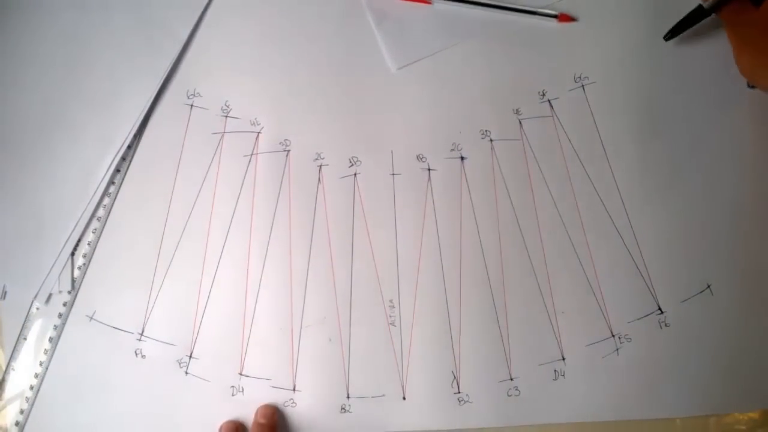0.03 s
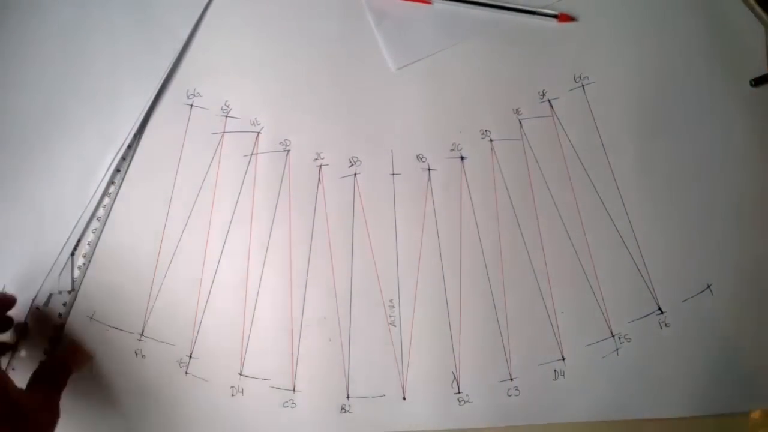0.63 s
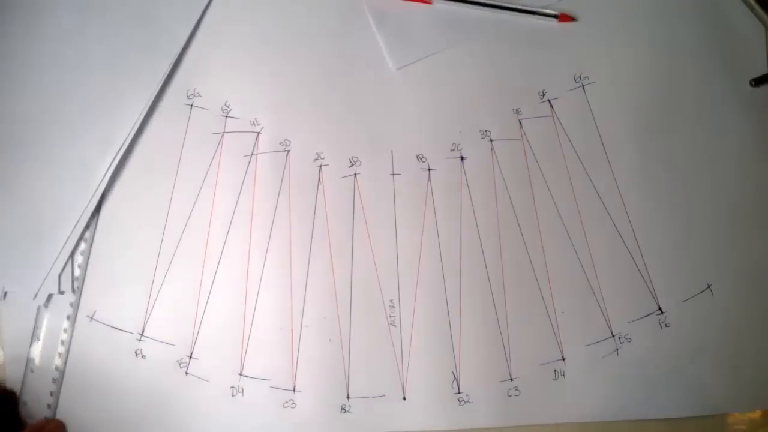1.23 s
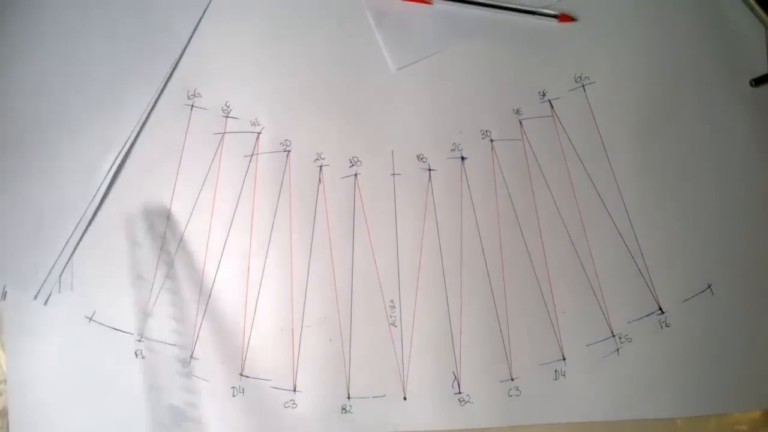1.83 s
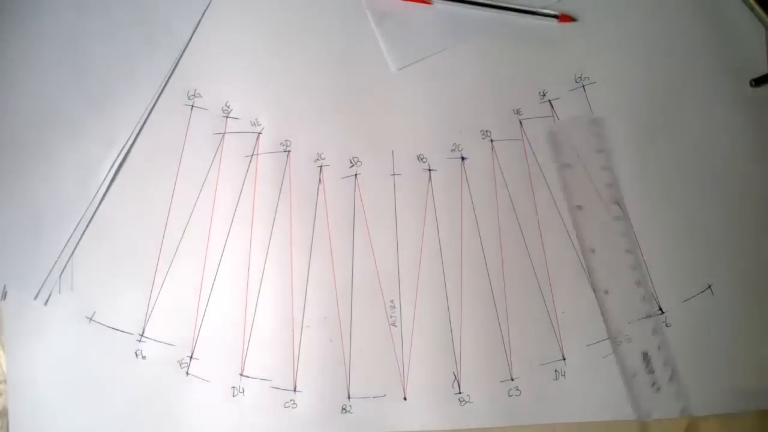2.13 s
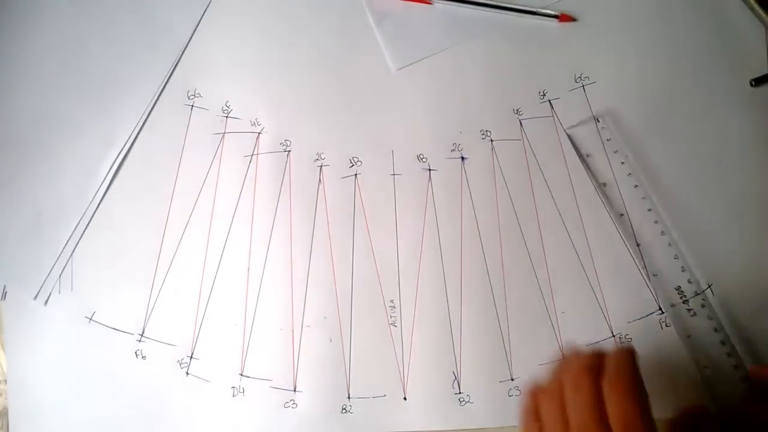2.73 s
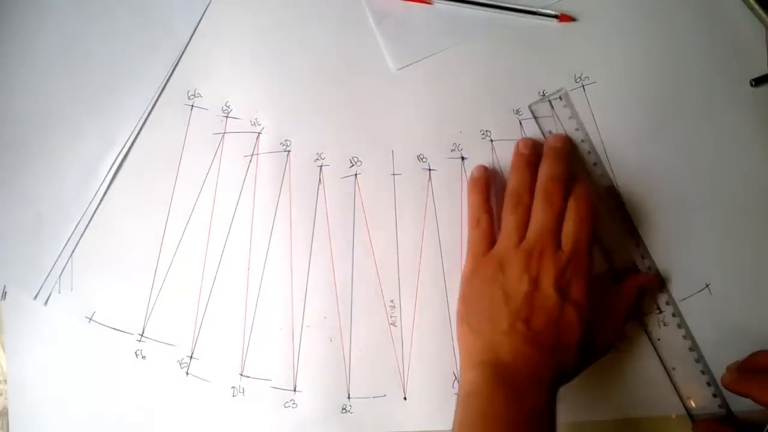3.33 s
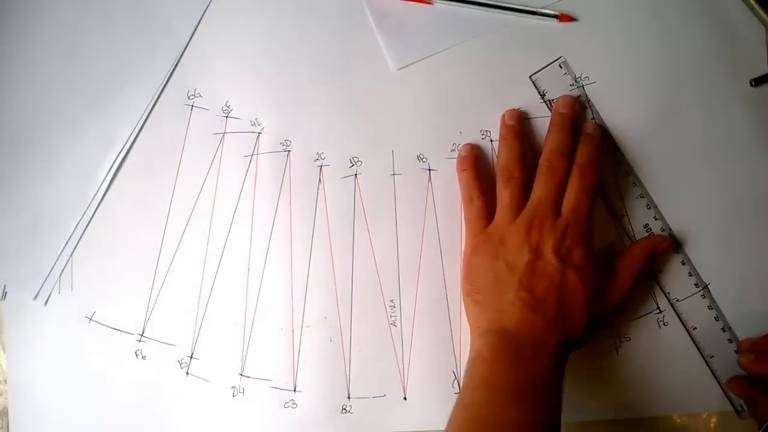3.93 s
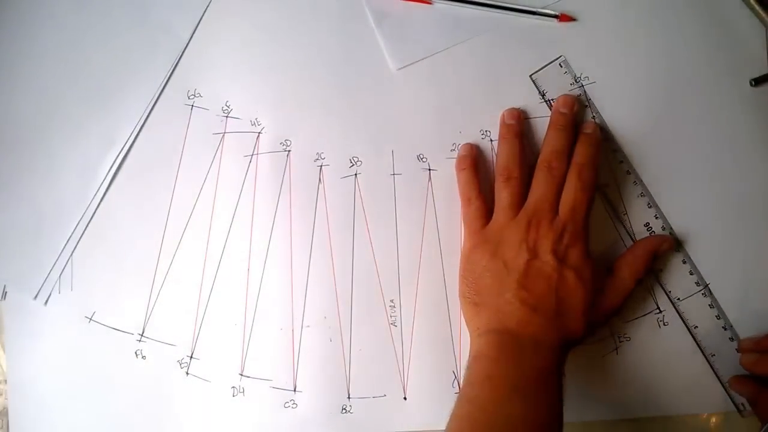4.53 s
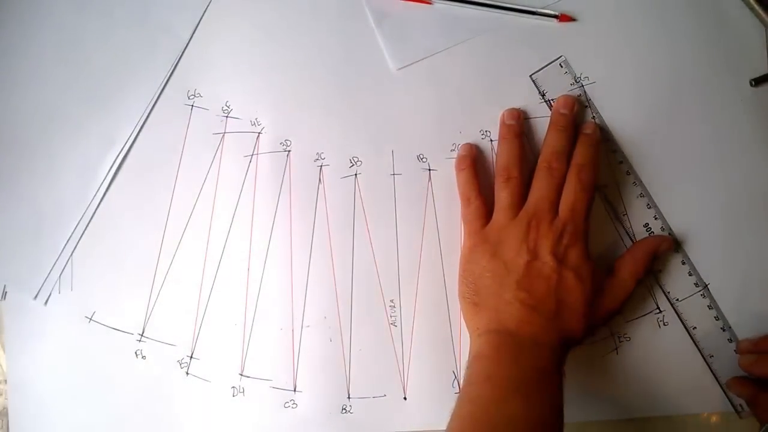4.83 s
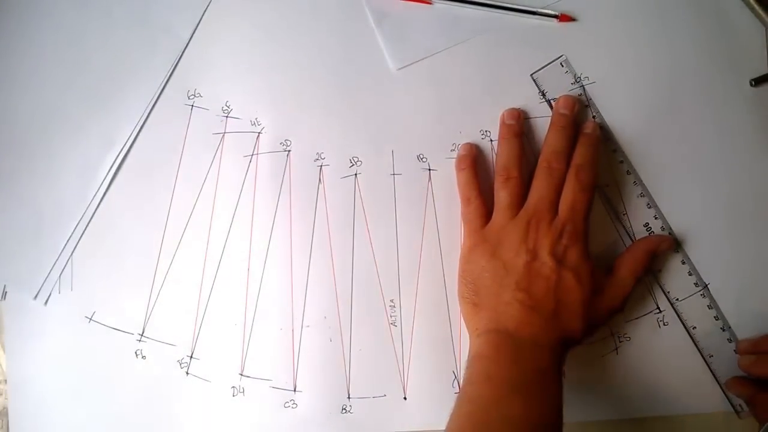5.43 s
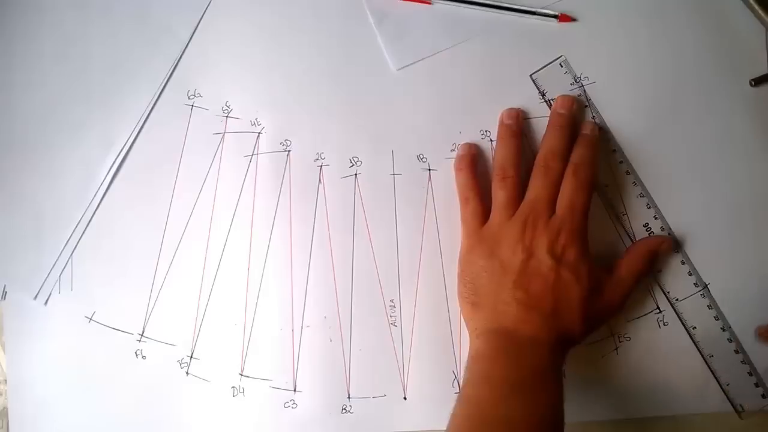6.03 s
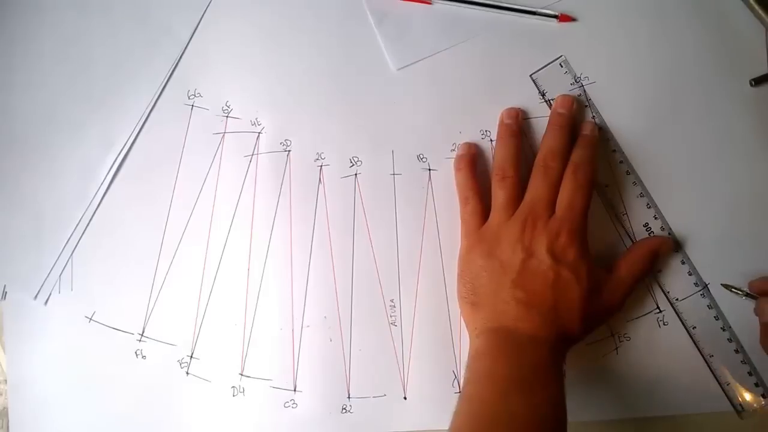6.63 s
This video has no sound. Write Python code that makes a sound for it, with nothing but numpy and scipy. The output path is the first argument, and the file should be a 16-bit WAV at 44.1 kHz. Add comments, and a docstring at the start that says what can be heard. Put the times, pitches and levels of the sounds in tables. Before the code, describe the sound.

A plastic ruler taps and scrapes on paper amid two heavy knocks on a drawing board, with small birds chirping outside.

```python
"""Ruler on a drawing board

A plastic ruler is picked up, set down on the paper and slid into place: it ticks, chatters and scrapes.
Hands bump the board and brush the sheet, sleeves rustle, and a pen rings as it is taken up.
Two heavy knocks ring the board's modes and overload a small camera microphone.
Small birds chirp outside, over quiet room noise and a thin electrical whine."""
import sys
import numpy as np
from scipy import signal
from scipy.fft import rfft, irfft, next_fast_len
from scipy.io import wavfile
from scipy.ndimage import uniform_filter1d, map_coordinates

SR = 44100
rng = np.random.default_rng(int(sys.argv[2]) if len(sys.argv) > 2 else 0)


def put_to_file(sound):
    """Save the sound as 16-bit audio at rate SR, in the file named by the first command-line argument."""
    columns = np.atleast_2d(sound).T  # one column per channel
    safe = np.clip(columns, -1, 1)
    whole_steps = np.round(safe * 32767)
    wavfile.write(sys.argv[1], SR, whole_steps.astype(np.int16))


N = 294543


def amp(db):
    """Decibels to gain."""
    return 10 ** (np.asarray(db) / 20)


def unit(x):
    """Scaled to rms 1."""
    return x / np.sqrt(np.mean(x ** 2) + 1e-20)


def along(points, hz):
    """A curve of (f/Hz, value) points, read on a log frequency axis."""
    f, values = np.transpose(points)
    return np.interp(np.log(hz + 1), np.log(f + 1), values)


def tilted(spectrum, slope_db):
    """A spectrum tipped about 3.5 kHz by slope_db per octave; the tilt shelves below 1 kHz."""
    return [(hz, db + slope_db * np.log2(max(hz, 1000) / 3500)) for hz, db in spectrum]


def fader(rows):
    """Gain per sample from (t/s, level/dB) rows, silent outside them."""
    s, db = np.transpose(rows)
    return amp(np.interp(np.arange(N) / SR, s, db, left=-120, right=-120))


def swell(start, end, ramp):
    """Gain of one movement: it speeds up, holds and stops."""
    t = np.arange(N) / SR
    return np.clip(np.minimum(t - start, end - t) / ramp + .5, 0, 1)


def fade(t, t60):
    """Exponential decay of 60 dB in t60."""
    return np.exp(-np.log(1000) * t / t60)


def wobble(rate):
    """A smooth random curve, rate knots a second."""
    knots = rng.standard_normal(int(N * rate / SR) + 4)
    return map_coordinates(knots, [np.arange(N) * rate / SR])


def coloured(x, spectrum):
    """x through an EQ curve of (f/Hz, level/dB), at rms 1."""
    size = next_fast_len(len(x) + 8192)
    eq = amp(along(spectrum, np.fft.rfftfreq(size, 1 / SR)))
    return unit(irfft(rfft(x, size) * eq, size)[:len(x)])


def snap(spectrum, size=1024):
    """The shortest causal pulse with this spectrum, peak 1."""
    eq = amp(along(spectrum, np.fft.rfftfreq(size, 1 / SR)))
    cepstrum = irfft(np.log(eq))
    cepstrum[1:size // 2] *= 2
    cepstrum[size // 2 + 1:] = 0
    pulse = irfft(np.exp(rfft(cepstrum)))
    return pulse / np.abs(pulse).max()


def dense_modes(spectrum, t60s):
    """A quarter second of noise-like ring, each band fading at its own speed."""
    noise = coloured(rng.standard_normal(SR // 4), spectrum)
    hz, t, bands = signal.stft(noise, SR, nperseg=256)
    decay = fade(t, along(t60s, hz)[:, None])
    return signal.istft(bands * decay, SR, nperseg=256)[1][:SR // 4]


def friction(spectrum, density, grain_db, size=N):
    """Hiss with tiny slips of uneven size, density a second."""
    slips = (rng.random(size) < density / SR) * rng.standard_normal(size)
    return coloured(rng.standard_normal(size) + amp(grain_db) * unit(slips), spectrum)


def shifting(x, patchy_db):
    """Hollows and bright spots that wander through a sound."""
    bands = signal.stft(x, nperseg=512)[2]
    patches = uniform_filter1d(rng.standard_normal(bands.shape), size=7, axis=0)
    patches = uniform_filter1d(patches, size=18, axis=1)
    return signal.istft(bands * amp(patchy_db * unit(patches)), nperseg=512)[1][:len(x)]


def add(track, s, sound):
    """Mix a sound into the track at time s."""
    start = round(s * SR)
    track[start:start + len(sound)] += sound[:N - start]


# room tone EQ: f/Hz, level/dB
ROOM_EQ = [(12, -33), (25, -1.5), (45, 3), (78, 1), (110, -4), (300, -10.5), (450, -16.5), (900, -20),
           (1300, -18.5), (2300, -24), (5000, -25), (6000, -29), (9000, -37), (16000, -33)]
# mains hum and thin whine: f/Hz, rms level/dB
HUM_TONES = [(54, -52), (161.5, -57.5), (1096, -58.5)]


def room(air_db=-43.5, waver_hz=1.57, rumble_db=4.0):
    """A bed of low room noise under electrical tones that waver together."""
    air = amp(air_db + 0.42 * wobble(2.9)) * coloured(rng.standard_normal(N), ROOM_EQ)
    bass = signal.filtfilt(*signal.butter(2, 150, fs=SR), air)
    air += (amp(rumble_db * wobble(10)) - 1) * bass  # the bass swells and sinks on its own
    t = np.arange(N) / SR
    drift = np.cumsum(waver_hz * wobble(20)) / SR
    hum = sum(amp(db) * np.sqrt(2) * np.sin(2 * np.pi * (hz * t + drift)) for hz, db in HUM_TONES)
    return air + hum


# fader ride of the moving arms: t/s, level/dB
ARM_MOVES = [(0.0, -43.5), (0.32, -42.5), (1.34, -49.5), (1.83, -41.5), (1.94, -40.5), (2.31, -49),
             (2.67, -55.5), (2.93, -68), (3.11, -48.5), (3.39, -43.5), (3.61, -54), (4.1, -54.5)]
# cloth EQ: f/Hz, level/dB
SLEEVE_EQ = [(60, 2), (200, -3.5), (450, -2), (900, -10.5), (1700, -7), (3000, -9.5), (5500, -13.5),
             (9000, -31.5)]


def sleeves(trim_db=1.0):
    """Cloth rustles softly until the arms come to rest."""
    rustle = shifting(friction(SLEEVE_EQ, density=600, grain_db=-5), patchy_db=2.5)
    return amp(trim_db) * fader(ARM_MOVES) * rustle


# the board's ringing modes: f/Hz, level/dB, t60/s
BOARD_MODES = [(58.4, -10, 0.26), (78.5, -2.5, 0.23), (122.4, 0, 0.15), (153.2, -0.5, 0.17),
               (194, -2, 0.13), (247, 8, 0.068), (291.5, 2, 0.15), (317, -3.5, 0.13), (403, -1, 0.14),
               (463, -18.5, 0.26), (522, -17, 0.14), (633, -23, 0.3), (770, -26, 0.15), (829, -19, 0.12),
               (930, -4, 0.088), (1010, -13, 0.153), (1148, -5, 0.11), (1350, -11, 0.15), (1710, -23, 0.15)]
# thud of its dense upper modes and the room: f/Hz, level/dB
THUD_EQ = [(30, -18.5), (70, -2.5), (300, -4.5), (600, -1), (1300, -9.5), (2200, -8.5), (4000, -28),
           (9000, -65.5)]
# decay of that thud: f/Hz, t60/s
THUD_DECAY = [(60, 0.12), (300, 0.22), (1000, 0.14), (4000, 0.18)]


def board(hardness_hz, place, ring_db=-10, thud_db=-13, attack_s=0.0015):
    """One blow at a place (0-1) rings the board; hardness is a low-pass corner, so soft blows are dull."""
    t = np.arange(SR // 4) / SR
    hz, db, t60 = np.transpose(BOARD_MODES)[:, :, None]
    # bending waves shorten with the root of frequency, so the place sets each mode's strength and sign
    shape = np.cos(np.pi * place * np.sqrt(hz / hz[0]))
    strength = shape * amp(db + rng.standard_normal(db.shape))
    ring = np.sum(strength * np.sin(2 * np.pi * hz * t) * fade(t, t60), axis=0)
    body = amp(ring_db) * ring + amp(thud_db) * dense_modes(THUD_EQ, THUD_DECAY)
    attack = 1 - np.exp(-t / attack_s)  # the motion takes a moment to fill the board
    return signal.lfilter(*signal.butter(2, min(hardness_hz, SR / 4), fs=SR), body * attack)


# soft hand bumps: t/s, level/dB, hardness/Hz
BUMP_CUES = [(.137, -11, 360), (1.252, -18, 330), (1.686, -8, 260), (1.97, -21.5, 199), (3.092, -5.5, 49),
             (3.521, -10.5, 66.3)]


def hand_bumps():
    """A hand lands near the board's edge with one dull thump."""
    out = np.zeros(N)
    for s, db, hardness_hz in BUMP_CUES:
        add(out, s, amp(db) * board(hardness_hz, place=0.748))
    return out


# heavy knocks: t/s, level/dB, hardness/Hz, place/0-1, lead of the first touch/s, touch level/dB
KNOCK_CUES = [(.206, 7.5, 860, 0.75, .0205, 3), (1.605, 8, 670, .08, .0147, -5)]


def knocks(rebounds=3, gap_s=.0155, loss_db=8, softening=0.45):
    """An edge touches the board, the full weight follows, then rebounds, each weaker and softer."""
    out = np.zeros(N)
    for s, db, hardness_hz, place, lead_s, touch_db in KNOCK_CUES:
        add(out, s - lead_s, amp(touch_db) * board(2 * hardness_hz, place=0.205))
        add(out, s, amp(db) * board(hardness_hz, place))
        for k in range(1, rebounds + 1):
            rebound = board(hardness_hz * softening ** k, place=0.858)
            add(out, s + k * gap_s, amp(db - k * loss_db) * rebound)
    return out


# hard plastic taps: t/s, tick level/dB, chatter trim/dB, ring trim/dB, board level/dB
TAP_CUES = [(.188, -21, 2, -3, -30), (1.068, -25.5, -10, 28, -33), (1.244, -19.5, -10, 7, -31),
            (1.486, -23, -2.5, 19, -21), (1.592, -24.5, 6, -2, -25), (1.687, -17, 5.5, 1, -35),
            (1.82, -24, 9.5, -3, -14.5), (1.83, -26.5, 9, -7, -12), (1.92, -21.5, 2.5, 17.5, -22.5),
            (2.632, -7.5, -3.5, -25, -27), (2.695, -11.5, -8.5, -14, -44), (3.0394, -14, 2, 11.5, -25),
            (3.954, -39.5, 9, 19, -48), (5.954, -38, 10, 11, -50), (6.0803, -19.5, -3, 2.5, -41)]
# tick EQ before brightening: f/Hz, level/dB
TICK_EQ = [(300, 1.5), (1000, -9), (1800, 1.5), (2600, 3), (3200, 4), (4000, 4), (5200, 0.5), (6500, -12),
           (8500, -26.5), (15000, -48)]
# the plastic strip's modes: f/Hz, level/dB, t60/s
RULER_MODES = [(1430, -35.5, 0.064), (2584, -27.5, 0.029), (2877, -34, 0.032), (3646, -47, 0.079),
               (4246, -54, 0.073), (4800, -40, 0.055)]


def ruler_taps(chatter_db=-12, chatter_t60=0.18, spikiness=0.54):
    """A sharp tick rings the strip and nudges the board; the strip then chatters on the paper."""
    out, t = np.zeros(N), np.arange(SR // 3) / SR
    ring = sum(amp(db) * np.sin(2 * np.pi * hz * t) * fade(t, t60) for hz, db, t60 in RULER_MODES)
    for s, db, chatter_trim_db, ring_db, board_db in TAP_CUES:
        tick = amp(ring_db) * ring
        add(tick, 0, snap(tilted(TICK_EQ, slope_db=4.5)))
        contacts = unit(rng.standard_normal(len(t)) * np.exp(spikiness * rng.standard_normal(len(t))))
        force = amp(chatter_db + chatter_trim_db) * contacts * fade(t, chatter_t60) / np.linalg.norm(tick)
        force[0] = 1  # the first hit
        add(out, s, amp(db) * signal.fftconvolve(force, tick))
        add(out, s, amp(board_db) * board(hardness_hz=1190, place=0.622))
    return out


# strokes of hand and ruler over the sheet: start/s, end/s, level/dB, rasp against the hiss/dB
STROKE_CUES = [(0.254, 1.03, -46, 0.5), (1.032, 1.083, -37, -16), (1.168, 1.37, -41, -7.5),
               (1.352, 1.432, -35.5, -6), (1.465, 1.606, -44, -17), (1.589, 1.71, -35.5, -16),
               (1.758, 1.906, -41, -2), (1.918, 1.983, -38, -16), (2.275, 2.436, -41, -12),
               (2.502, 2.606, -49, -3), (2.714, 2.903, -47.5, 4), (3.147, 3.335, -49, -16),
               (3.31, 3.6, -41.5, -11), (3.762, 3.911, -48.5, -20), (4.121, 4.19, -50.5, -2),
               (4.226, 4.375, -51.5, 0), (5.995, 6.122, -46, -14)]
# paper hiss EQ before tilting: f/Hz, level/dB
PAPER_EQ = [(200, -10), (500, -11.5), (1100, -15), (1600, -7.5), (2200, -5.5), (3100, -1.5), (3900, -5),
            (4600, -0.5), (5500, -6), (6700, -9), (8400, -23), (12000, -33)]
# narrow rasp near 5 kHz: f/Hz, level/dB
RASP_EQ = [(3500, -45), (4850, -14), (5250, 0), (5600, -11), (6800, -19), (9000, -50)]


def paper_strokes(ramp_s=.04, firm_db=-39, firm_slope_db=1, thinning=0.29, uneven_db=0.7):
    """Skin and plastic slide over the paper; the lighter the touch, the thinner the hiss."""
    out = np.zeros(N)
    for start, end, db, rasp_db in STROKE_CUES:
        t = np.arange(int((end - start + ramp_s) * SR)) / SR
        speed = np.clip(np.minimum(t, t[-1] - t) / ramp_s, 0, 1)
        slope_db = firm_slope_db + thinning * (firm_db - db)
        hiss = friction(tilted(PAPER_EQ, slope_db), density=1200, grain_db=-9.5, size=len(t))
        rasp = amp(rasp_db) * coloured(rng.standard_normal(len(t)), RASP_EQ)
        add(out, start - ramp_s / 2, amp(db) * speed * (hiss + rasp))
    return amp(uneven_db * wobble(45)) * shifting(out, patchy_db=1.5)


# notes of each kind of call: delay/s, length/s, first f/Hz, middle f/Hz, last f/Hz, rasp/Hz, level/dB
CALL_NOTES = {"chirrup": [(0, .074, 4244, 4928, 4470, 150, -6), (.055, 0.076, 4150, 3460, 3760, 274, -4),
              (.108, .032, 3650, 3990, 3005, 380, 0), (.13, .15, 4790, 4670, 4690, 218, -12.5)],
              "peep": [(0, 0.0685, 5200, 5340, 5140, 207, -0.5), (.062, 0.064, 5700, 6270, 6060, 260, -17)],
              "slur": [(0, .15, 4500, 4400, 3600, 520, -1)]}
# bird calls: t/s, kind, level/dB, pitch ratio
BIRD_CUES = [(.57, "chirrup", -40, 1.02), (2.378, "chirrup", -37, 0.98), (3.275, "chirrup", -32.5, 0.99),
             (4.396, "chirrup", -34, 0.99), (4.913, "peep", -34.5, 1.01), (5.042, "slur", -45.5, 0.76),
             (5.183, "slur", -47.5, 0.88), (5.312, "peep", -32.5, .99), (5.716, "slur", -45.5, 0.99),
             (6.291, "slur", -48.5, 0.92), (6.58, "peep", -51.5, 0.9)]


def birds(direct_db=-7, near_t60=0.064, far_t60=.55):
    """Calls of raspy arched whistles, smeared by echoes between the walls outside."""
    song = np.zeros(N)
    rasp = wobble(900)
    for s, kind, call_db, ratio in BIRD_CUES:
        for delay, length, first_hz, middle_hz, last_hz, rasp_hz, db in CALL_NOTES[kind]:
            progress = np.linspace(0, 1, int(length * SR))
            arch = np.polyfit([0, .5, 1], [first_hz, middle_hz, last_hz], 2)
            jitter = rasp_hz * rasp[round(s * SR) - np.arange(len(progress))]
            pitch = ratio * np.polyval(arch, progress) + jitter
            whistle = signal.windows.tukey(len(pitch), .3) * np.sin(2 * np.pi * np.cumsum(pitch) / SR)
            add(song, min(s + delay, N / SR), amp(call_db + db) * whistle)
    t = np.arange(SR) / SR
    # near walls answer at once, far ones leave a longer tail
    walls = rng.standard_normal(SR) * (4 * fade(t, near_t60) + fade(t, far_t60))
    echoes = signal.fftconvolve(song, walls / np.linalg.norm(walls))[:N]
    return amp(direct_db) * song + echoes


# arm drags: start/s, end/s, level/dB
DRAG_CUES = [(0.578, 0.895, -45), (1.075, 1.156, -45), (1.255, 1.294, -35), (1.36, 1.57, -46),
             (2.272, 2.43, -32.5), (5.417, 5.78, -46.5)]
# EQ of the board's low murmur: f/Hz, level/dB
DRAG_EQ = [(50, -8.5), (140, 5.5), (230, -1.5), (320, 2.5), (450, -7), (700, -12.5), (1500, -19.5),
           (4000, -67)]


def arm_drags():
    """A dragging arm makes the board murmur."""
    weight = sum(amp(db) * swell(start, end, ramp=0.05) for start, end, db in DRAG_CUES)
    return weight * friction(DRAG_EQ, density=200, grain_db=-4.5)


# fader ride of the ruler's shove: t/s, level/dB
SHOVE_RIDE = [(2.87, -50), (2.9, -31.5), (2.925, -20.5), (2.962, -19.5), (2.982, -31), (3.03, -31.5),
              (3.08, -41), (3.125, -37), (3.16, -47)]
# EQ of its scraping edge: f/Hz, level/dB
SCRAPE_EQ = [(600, -30), (1400, -25), (2150, -12.5), (2520, -2), (2950, -4), (3900, 0.5), (4600, -4),
             (5300, -2), (7700, -21), (12000, -39), (16000, -39.5)]


def ruler_scrape(trim_db=-1.5, judder_db=1.5):
    """The ruler's edge judders as it is shoved over the sheet."""
    judder = amp(trim_db + judder_db * wobble(190))
    return judder * fader(SHOVE_RIDE) * friction(SCRAPE_EQ, density=2500, grain_db=-12)


# the pen barrel's modes: f/Hz, level/dB, t60/s
PEN_MODES = [(810, 0, 0.052), (890, -6, 0.084), (1025, 3, 0.043), (1170, -3.5, 0.1), (1470, -9, 0.068)]


def pen(at_s=6.0802, tap_db=-36.5):
    """A pen knocks as it is taken up, and its hollow barrel rings briefly."""
    out, t = np.zeros(N), np.arange(SR // 4) / SR
    for hz, db, t60 in PEN_MODES:
        add(out, at_s, amp(tap_db + db) * np.sin(2 * np.pi * (hz * t + rng.random())) * fade(t, t60))
    return out


def scene():
    """The mono mix at the microphone, with its own hiss."""
    hiss = amp(-59.5) * rng.standard_normal(N)
    hits = knocks() + hand_bumps() + ruler_taps() + pen()
    rubs = paper_strokes() + ruler_scrape() + arm_drags() + sleeves()
    return (hits + rubs + birds() + room() + hiss)[None]


# thin overload clicks at the height of the heavy knocks: t/s, level/dB
OVERLOAD_CLICKS = [(0.216, -14.5), (1.6098, -7.5)]


def record(dry, top_hz=15900):
    """The heavy knocks flatten at full scale and each gets a click; nothing passes the band limit."""
    clipped = dry / (1 + np.abs(dry) ** 8) ** (1 / 8)
    for s, db in OVERLOAD_CLICKS:
        at = round(s * SR)
        clipped[:, at] -= amp(db) * np.sign(clipped[:, at])
    size = next_fast_len(N + 8192)
    passband = np.fft.rfftfreq(size, 1 / SR) < top_hz
    return irfft(rfft(clipped, size) * passband, size)[:, :N]


dry = scene()
out = record(dry)
put_to_file(out)
```